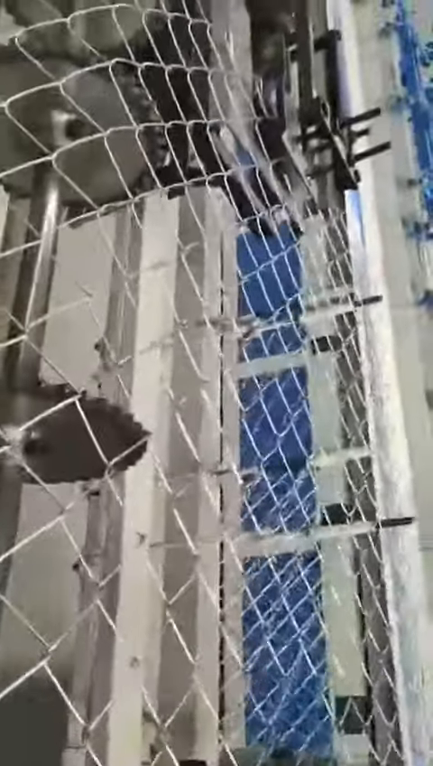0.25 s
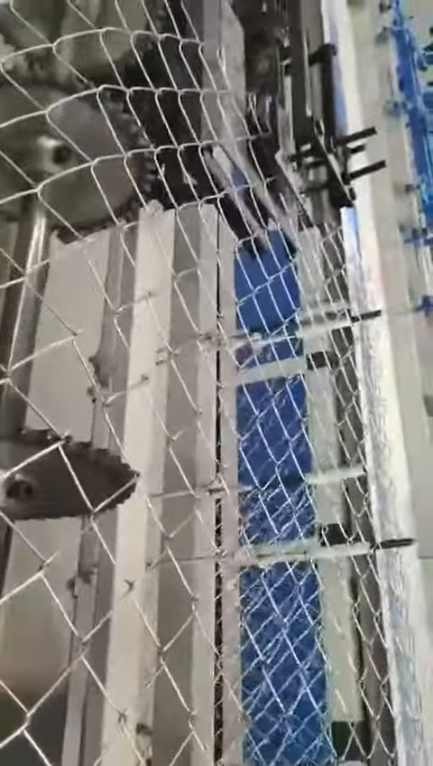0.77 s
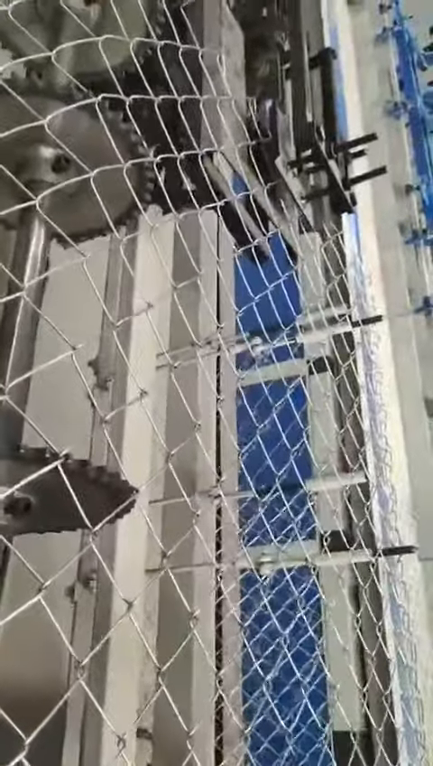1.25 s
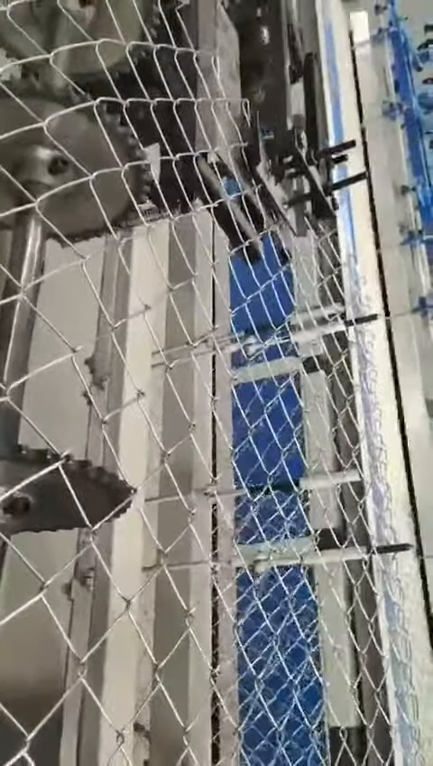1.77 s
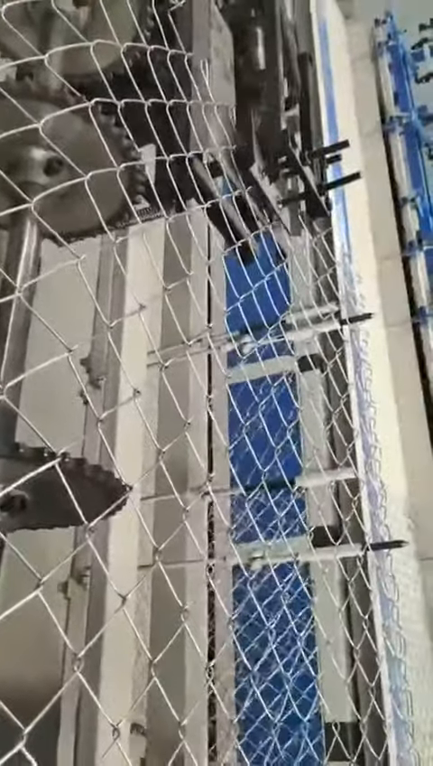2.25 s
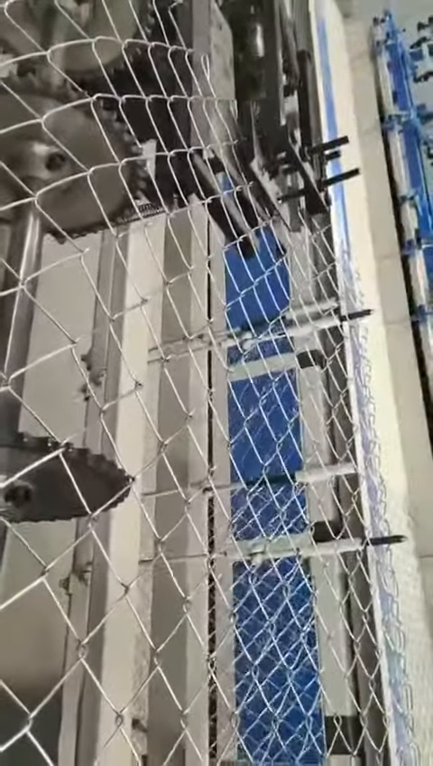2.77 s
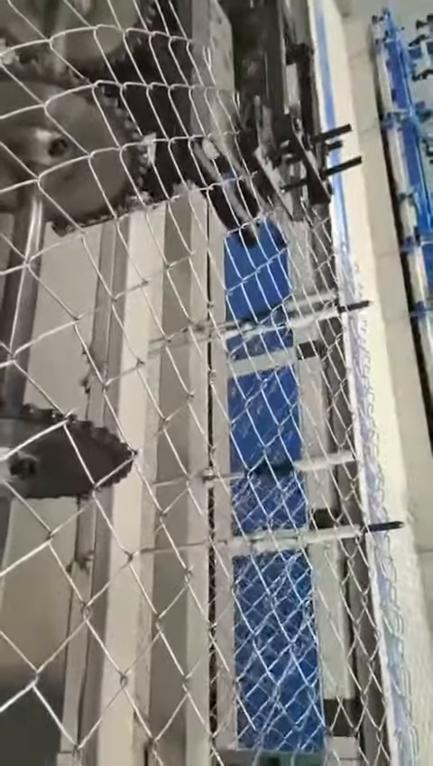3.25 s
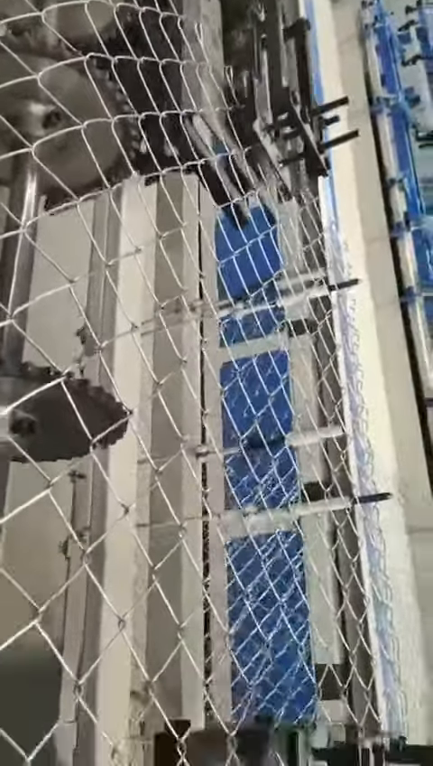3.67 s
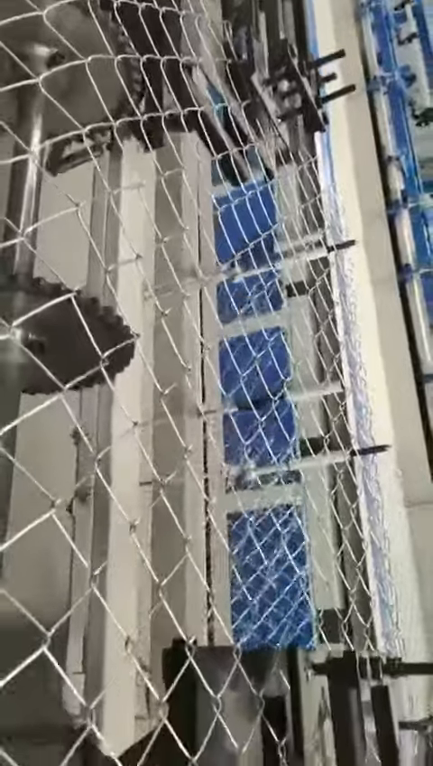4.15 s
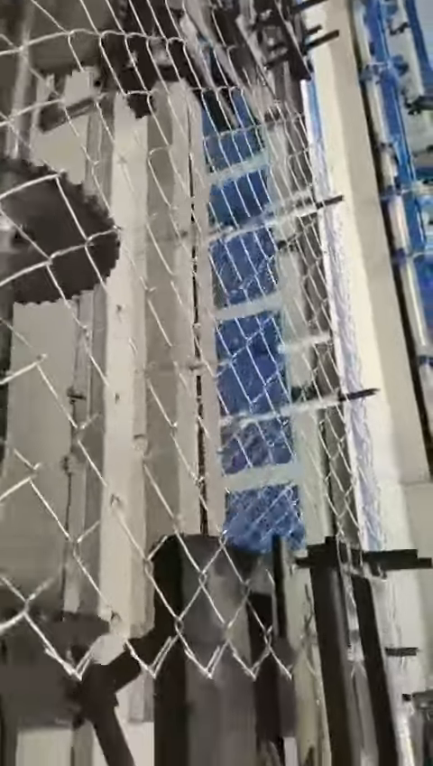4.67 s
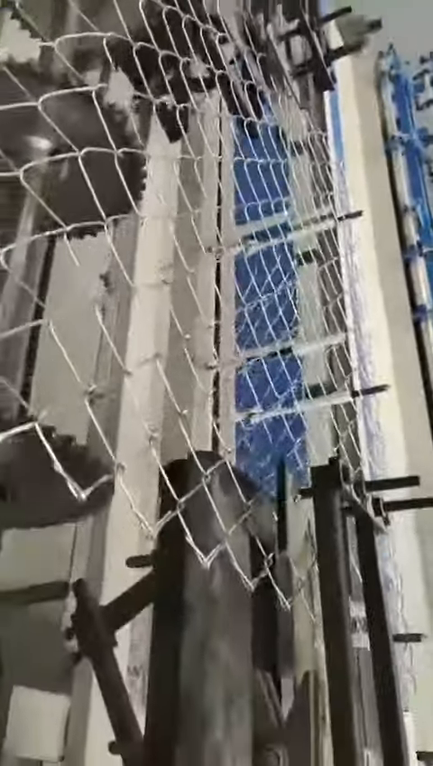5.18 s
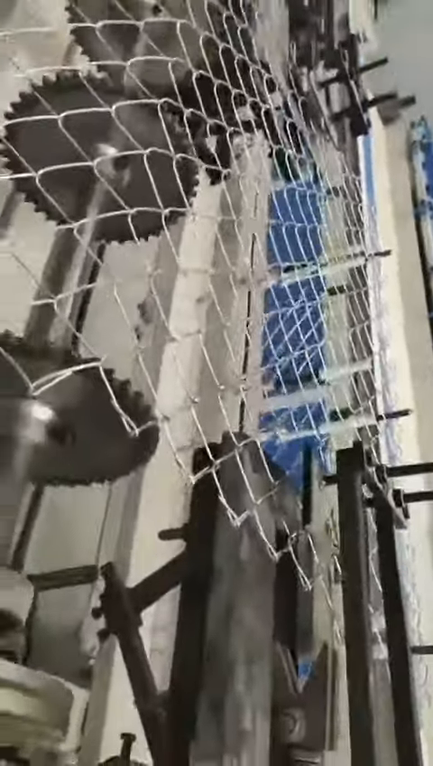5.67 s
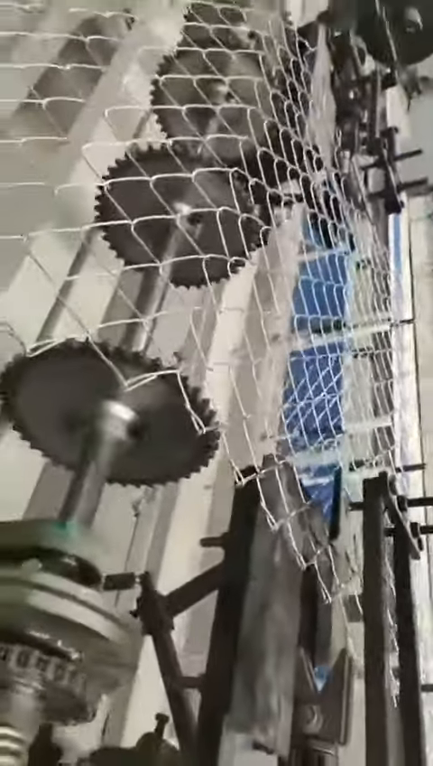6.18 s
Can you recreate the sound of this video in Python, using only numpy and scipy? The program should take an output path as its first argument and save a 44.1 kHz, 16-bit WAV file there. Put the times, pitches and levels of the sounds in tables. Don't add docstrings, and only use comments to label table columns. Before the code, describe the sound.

Close to a wire weaving machine in a factory hall, gears rumble and chains clatter without pause, over a wavering low-mid motor whine, shaking floor and airy far machinery. From 0 to 0.8 seconds, bright brushing slaps of a blade slow down. At 1.13 a mesh advance lands with a low thud and frame groan; hooks and cutter crack on steel until about 2.0, with a strong frame blow near 2.1. From 2.45 to 4.7 the blade whips the next wire about eleven times a second, each slap a short hissy chatter ringing its guide, strongest around 4.1 to 4.6. Lighter pawl taps run from 2.9 to 3.3, with a thud near 3.0. Winding stops; at 5.06 to 5.27 the second advance thuds repeatedly with rubbing slides. Knocks and clanks return near 5.8 to 6.0, a heavy blow falls at 6.13, and the roar continues to 6.4.

```python
import sys
import numpy as np
from scipy import signal
from scipy.fft import rfft, irfft
from scipy.io import wavfile
from scipy.ndimage import uniform_filter1d

SR = 44100
rng = np.random.default_rng(int(sys.argv[2]) if len(sys.argv) > 2 else 0)


def elevation(decibels):
    levels = np.asarray(decibels, float)
    return 10 ** (levels / 20)


def dump(signal):
    limited = np.clip(np.atleast_2d(signal).T, -1, 1)
    pcm = np.round(limited * 32767).astype(np.int16)
    wavfile.write(sys.argv[1], SR, pcm)


N = 283122

# start in seconds, peak in dB, centre in Hz, guide ringing in dB.
SLAPS = [(2.4594, -26, 5510, -41), (2.5304, -26, 5480, -45), (2.6509, -22, 4700, -39),
         (2.7482, -17.5, 5730, -34), (2.8394, -22, 5560, -45), (2.9444, -21.5, 5640, -35),
         (3.0453, -19, 5760, -31.5), (3.09, -18, 5500, -36), (3.2257, -20, 5300, -30.5),
         (3.315, -28, 5600, -55.5), (3.395, -18.5, 5500, -30.5), (3.4986, -18, 5600, -49),
         (3.595, -13.5, 5510, -36), (3.6894, -21, 5380, -42), (3.7853, -16, 5540, -32.5),
         (3.879, -19, 5600, -41), (3.9624, -19, 5460, -49), (4.1062, -21, 5520, -40),
         (4.1598, -16, 5470, -48), (4.267, -14, 4740, -48), (4.3151, -14, 5370, -43),
         (4.3852, -12, 5400, -35), (4.4882, -17, 4770, -43), (4.547, -24, 5500, -43),
         (4.583, -15, 5600, -37), (4.6994, -27, 5540, -47)]


def evened(x):
    return x / np.sqrt(np.mean(x ** 2) + 1e-20)


def drift(noise, size):
    return evened(uniform_filter1d(uniform_filter1d(noise, size=size), size=size))


def along(rows):
    table = np.vstack(rows)
    return np.interp(np.arange(N) / SR, table[:, 0], table[:, 1], left=-120, right=-120)


def add(mix, s, sound):
    part = mix[round(s * SR):][:len(sound)]
    part += sound[:len(part)]


def high_pass(x, hz):
    return signal.sosfilt(signal.butter(2, hz, "high", fs=SR, output="sos"), x)


def resonate(x, hz, width):
    r = np.exp(-np.pi * width / SR)
    return 2 * signal.lfilter([1 - r], [1, -r * np.exp(2j * np.pi * hz / SR)], x).real


def band(noise, hz, width):
    return evened(resonate(resonate(noise, hz, width), hz, width))


def clicks(per_s, spread_db):
    size = elevation(spread_db * np.minimum(rng.exponential(1, N), 4)) * rng.choice([-1, 1], N)
    return evened(size * (rng.random(N) < per_s / SR))


def roar(spectrum, level_db, patchy_db, grain=0, per_s=300, size=512):
    source = rng.standard_normal(N) + grain * clicks(per_s, 1.1)
    overlap = size * 3 // 4
    hz, t, z = signal.stft(source, SR, nperseg=size, noverlap=overlap)
    patches = uniform_filter1d(rng.standard_normal(z.shape), size=2, axis=0)
    patches = evened(uniform_filter1d(patches, size=14, axis=1))
    f, db = np.transpose(spectrum)
    colour_db = np.interp(np.log(hz + 1), np.log(f), db, left=-90, right=-90)
    z = z * elevation(colour_db[:, None] + patchy_db * patches)
    x = signal.istft(z, SR, nperseg=size, noverlap=overlap)[1][:N]
    return elevation(level_db) * evened(x)


def gear_load():
    # time in seconds, clatter in dB.
    load_steps = [(0.0, -29), (1.127, -32), (1.136, -24), (1.48, -28), (1.86, -23.5), (2.0, -27),
                  (2.25, -24), (2.57, -27.5), (3.09, -27.5), (3.7, -30), (4.35, -28.5), (5.06, -30),
                  (5.115, -32.5), (5.14, -26.5), (5.52, -29.5), (5.78, -26), (6.26, -23.5), (6.42, -26.5)]
    mean_db = -28
    return along(load_steps) - mean_db


def gear_roar(load):
    # frequency in Hz, level in dB per Hz.
    rumble = [(71, -53), (120, -20.5), (219, -0.5), (440, -4), (464, -10), (592, -6.5), (651, -13.5),
              (1010, -10), (1500, -22.5), (1950, -41), (3300, -120)]
    # frequency in Hz, level in dB per Hz.
    clatter = [(300, -19.5), (520, -10), (700, -6.5), (1050, -9), (1900, -8.5), (2500, -11), (3000, -16.5),
               (3600, -25.5), (4800, -32), (6500, -51.5)]
    low = roar(rumble, -36.5 + 0.38 * load, patchy_db=0.0, grain=0.14, per_s=120, size=1024)
    return low + roar(clatter, -28.5 + 0.95 * load, patchy_db=1.2, grain=0.21, per_s=730)


def wire_hiss():
    # time in seconds, hiss in dB.
    wire_run = [(0.0, -30.5), (1.125, -42), (1.136, -30), (1.42, -38.5), (1.72, -34), (1.8, -27.5),
                (2.2, -27), (2.5, -32), (2.8, -29.5), (3.9, -30), (4.58, -27), (4.95, -38.5), (5.2, -33),
                (5.55, -43.5), (5.78, -40), (5.8, -29.5), (6.2, -29), (6.42, -33)]
    # frequency in Hz, level in dB per Hz.
    hiss = [(1500, -17), (2500, -2), (3200, -4), (4200, -4.5), (5700, -3), (6600, -10), (7400, -10.5),
            (8600, -32.5)]
    mean_db = -33
    level_db = -34 + 1.184 * (along(wire_run) - mean_db)
    return roar(hiss, level_db, patchy_db=2.2, grain=0.51, per_s=830)


def slaps():
    # start in seconds, peak in dB, centre in Hz, length in seconds.
    last_slaps = [
        (0.038, -17.5, 4640, 0.02),
        (0.145, -20, 5340, 0.023),
        (0.206, -23, 5800, .035),
        (0.325, -21, 6050, .025),
        (0.3594, -26.5, 6500, 0.051),
        (0.514, -23.5, 5960, 0.034),
        (0.5994, -23, 5560, 0.05),
        (0.748, -26, 4780, 0.039),
    ]
    slap_s = 0.032
    slap_hiss, last_hiss = (4900, 2300, 0.72), (5600, 5000, 1.16)  # (Hz, width Hz, share)
    rows = [(*row, last_hiss) for row in last_slaps]
    rows += [(s, db, hz, slap_s, slap_hiss) for s, db, hz, _ in SLAPS]
    out, t = np.zeros(N), np.arange(4000) / SR
    for s, db, hz, length, (hiss_hz, width, share) in rows:
        noise = rng.standard_normal((2, len(t)))
        chatter = share * band(noise[0], hiss_hz, width) + 0.49 * band(noise[1], hz, 130)
        swell = np.minimum(t / 0.0041, 1) * np.exp(-(t / length) ** 2)
        add(out, s, elevation(db - 12.5) * chatter * swell)
    return out


def spinning_wire():
    # time in seconds, ringing in dB.
    spin = [
        (2.44, -41),
        (2.65, -49),
        (2.9, -38),
        (3.3, -36),
        (3.85, -39.5),
        (4.1, -31),
        (4.4, -34.5),
        (4.58, -33),
        (4.78, -45),
    ]
    # frequency in Hz, width in Hz, level in dB.
    guide = [(3950, 250, -9), (4735, 150, -9), (5510, 75, 0), (5580, 90, -2), (7400, 200, -14)]
    press_s, press_lag_s = 0.017, 0.016
    clumps = drift(rng.standard_normal(N), 400)
    drive = (clicks(600, 1.7) + 0.5 * rng.standard_normal(N)) * elevation(0.4 * clumps)
    ring = sum(elevation(db) * band(drive, hz, width) for hz, width, db in guide)
    ring = 1.3 * evened(ring / uniform_filter1d(ring ** 2, size=900) ** 0.3)
    t = np.arange(N) / SR
    pressed = sum(elevation(db) * np.exp(-((t - s - press_lag_s) / press_s) ** 2) for s, _, _, db in SLAPS)
    return (elevation(along(spin) - 2.5) + pressed) * ring


def knocks():
    # start in seconds, peak in dB, ring in Hz, t60 in seconds, second ring in Hz.
    hook_knocks = [(1.131, -19, 2290, 0.18, 5300), (1.294, -12.5, 2030, 0.095, 2930),
                   (1.521, -20, 2280, 0.12, 4200), (1.616, -18.5, 2550, 0.31, 6070),
                   (1.769, -13.5, 3300, .09, 7500), (1.811, -9.5, 5150, 0.093, 6700),
                   (1.74, -26, 5020, .12, 7360), (2.0, -9.5, 4700, 0.12, 5470),
                   (5.131, -17.5, 2050, 0.15, 5320), (5.259, -22.5, 2140, 0.15, 4200),
                   (5.541, -24, 2240, 0.072, 3710), (5.797, -17, 3270, 0.14, 4796),
                   (5.985, -17, 2330, 0.12, 2960)]
    # start in seconds, peak in dB, ring in Hz.
    taps = [
        (0.329, -22, 3260),
        (0.55, -16, 2710),
        (2.581, -25, 2600),
        (2.883, -13.5, 2550),
        (2.965, -13.5, 2150),
        (3.041, -13.5, 2400),
        (3.145, -18.5, 2440),
        (3.225, -18, 2550),
        (3.261, -12, 2750),
        (3.33, -15.5, 2640),
    ]
    # start in seconds, peak in dB, ring in Hz, second ring in Hz.
    clanks = [
        (1.908, -17.5, 3900, 5730),
        (5.978, -16.5, 4000, 5000),
        (5.69, -35, 4500, 4500),
        (5.0, -33, 4300, 4500),
    ]
    blows = [(*row, 0.73) for row in hook_knocks]
    blows += [(s, db, hz, 0.077, hz * 1.15, 0.27) for s, db, hz in taps]
    blows += [(s, db, hz, 0.16, other_hz, 2.46) for s, db, hz, other_hz in clanks]
    chatter_s, chatter_hz = 0.03, 4460
    out, t = np.zeros(N), np.arange(8000) / SR
    for s, db, hz, t60, other_hz, crack in blows:
        noise, phase = rng.standard_normal((3, len(t))), rng.random()
        rings = 0.55 * np.sin(2 * np.pi * (hz * t + phase)) + 0.3 * np.sin(2 * np.pi * other_hz * t)
        rings += 1.2 * band(noise[1], hz, 460) + 0.16 * band(noise[2], other_hz, 300)
        fall = elevation(-60 * t / t60)
        rattle = crack * band(noise[0], (hz + other_hz) / 2, chatter_hz)
        rattle *= 0.47 * fall + 0.45 * np.exp(-(t / chatter_s) ** 4)
        strike = np.minimum(t / 0.001, 1) * (1 + 0.5 * np.exp(-t / 0.004))
        add(out, s, elevation(db - 12.5) * (rattle + rings * fall) * strike)
    return high_pass(out, 700)


def thuds():
    # start in seconds, peak in dB, ring in Hz, t60 in seconds.
    frame_blows = [(1.134, -3.5, 328, 0.12), (1.189, -12, 422, 0.36), (1.351, -19, 262, 0.17),
                   (1.518, -12.5, 564, 0.22), (1.679, -10, 880, 0.11), (1.859, -3, 790, 0.084),
                   (1.944, -23.5, 734, 0.09), (2.101, 3.5, 620, 0.095), (2.869, -16, 533, 0.2),
                   (3.023, -5.5, 502, 0.13), (4.748, -13, 376, 0.41), (5.059, -3, 600, 0.099),
                   (5.132, -1, 286, 0.18), (5.194, -9.5, 261, 0.16), (5.269, -5, 570, 0.19),
                   (5.759, -4, 895, 0.085), (6.134, 1, 380, 0.073)]
    out, t = np.zeros(N), np.arange(12000) / SR
    for s, db, hz, t60 in frame_blows:
        noise = rng.standard_normal((2, len(t)))
        body = band(noise[0], hz, 100) + 0.32 * band(noise[1], 440, 300)
        add(out, s, elevation(db - 17) * body * elevation(-60 * t / t60) * np.minimum(t / 0.007, 1))
    return high_pass(out, 170)


def drags():
    advances = [
        1.13,
        5.13,
    ]
    # time after its start in seconds, length in seconds, Hz, width in Hz, level in dB.
    advance_parts = [(-.3, 0.53, 535, 37.04, -38.5), (0, .35, 253, 33.3, -37.5), (0, 0.04, 394, 238, -30.5),
                     (.03, 0.31, 553.5, 65, -36.5), (0, .36, 2100, 690, -35), (0.54, .3, 269, 48.6, -36),
                     (.5, .42, 829, 250, -35), (.65, .72, 2870, 940, -34), (0, .8, 327, 237.6, -37.5),
                     (0, .3, 148, 80, -42), (1.011, .3, 113, 70, -47.5)]
    # start in seconds, length in seconds, Hz, width in Hz, level in dB.
    single_drags = [(0.099, 1, 895, 78, -53.5), (1.15, 0.18, 860, 82, -44), (1.1, 0.36, 1610, 180, -43),
                    (1.7, 0.29, 1150, 110, -39.5), (1.87, 0.073, 203, 40, -37), (2.2, 0.36, 730, 53, -39),
                    (2.651, 0.82, 1140, 74, -41), (2.85, 0.5, 580, 100, -41.5),
                    (2.77, 0.54, 2430, 800, -35.5), (5.7, .3, 424, 200, -33.5),
                    (0.77, 0.25, 370, 150, -40.5), (2.9, 0.48, 360, 200, -39.5),
                    (3.699, 0.85, 960, 84, -43), (4.1, 0.73, 1730, 150, -41),
                    (5.135, .035, 295, 250, -25.5), (1.45, 0.16, 275, 76, -42),
                    (5.136, 0.14, 1330, 202, -33), (5.998, .3, 377, 41, -35.5),
                    (5.903, 0.39, 1540, 230, -49)]
    rise, fall = 0.15, 0.29
    cycles = [(start + s, *rest) for start in advances for s, *rest in advance_parts]
    out = np.zeros(N)
    for s, length, hz, width, db in cycles + list(single_drags):
        noise = rng.standard_normal(int(length * SR))
        u = np.linspace(0, 1, len(noise))
        grip = np.clip(np.minimum(u / rise, (1 - u) / fall), 0, 1)
        add(out, s, elevation(db + 0.7) * band(noise, hz, width) * np.sin(np.pi / 2 * grip))
    return high_pass(out, 70)


def whine(load):
    motor_hz = 469.5
    noise = rng.standard_normal((4, N))
    t = np.arange(N) / SR
    winding = uniform_filter1d(1.0 * (t > 4.1) * (t < 4.9), size=8000)
    level_db = -43.5 - 0.2 * load + 1.7 * drift(noise[3], 3000) + 1.5 * winding
    line_hz = motor_hz + 3.5 * drift(noise[0], 4000)
    line = np.sqrt(2) * np.sin(2 * np.pi * np.cumsum(line_hz) / SR)
    return elevation(level_db) * (0.89 * line + band(noise[1], motor_hz, 52) + 0.75 * band(noise[2], 930.2, 55))


def hall(x):
    t, t60 = np.arange(SR // 2) / SR, 0.6
    echoes = rng.choice([-1, 1], len(t)) * (rng.random(len(t)) < 0.05)
    tail = echoes * elevation(-60 * t / t60) * (t > 0.012)
    return signal.fftconvolve(x, tail / np.linalg.norm(tail))[:N]


def shaking_floor(load):
    # frequency in Hz, level in dB per Hz.
    floor_colour = [(20, -39.5), (40, -20.5), (63, -18), (100, -7), (140, -6), (200, -2), (300, -41)]
    return roar(floor_colour, -45.5 + 0.62 * load, patchy_db=1.5, size=4096)


def far_machines():
    # frequency in Hz, level in dB per Hz.
    air_colour = [(3000, -9), (4200, 5), (5500, -1.5), (6700, -1.5), (7400, 1.5), (8600, -24)]
    return roar(air_colour, -48.5, patchy_db=3.5)


def scene():
    load = gear_load()
    hits = slaps() + knocks() + thuds()
    machine = gear_roar(load) + wire_hiss() + spinning_wire() + drags() + whine(load)
    mono = machine + hits + elevation(-9) * hall(hits) + shaking_floor(load) + far_machines()
    return np.array([mono, mono])


def narrowed(x):
    window = np.sin(np.pi * (np.arange(1024) + 0.5) / 1024)
    hz, t, z = signal.stft(x, SR, nperseg=len(window), window=window)
    edge_hz = np.repeat(7900 + 85 * rng.standard_normal(len(t)), repeats=4)[:len(t)]
    edge_hz = edge_hz - 300 * (rng.random(len(t)) < 0.09)
    return signal.istft(z * (hz[:, None] < edge_hz), SR, nperseg=len(window), window=window)[1][:, :N]


def side_flickers():
    # start in seconds, low edge in Hz, high edge in Hz, side level in dB.
    noise_bands = [(.37, 4150, 5160, -49), (1.16, 6200, 7500, -48), (1.37, 5160, 6300, -48),
                   (1.58, 4150, 5200, -49), (2.16, 4130, 5190, -40), (2.16, 6200, 7600, -44),
                   (2.789, 4100, 5770, -38), (3.459, 4550, 6240, -38), (3.97, 4640, 5950, -33),
                   (4.18, 4230, 5170, -38), (5.5, 5600, 6900, -55)]
    side, hz = np.zeros(N), np.fft.rfftfreq(2048, 1 / SR)
    for s, low_hz, high_hz, db in noise_bands:
        noise = irfft(rfft(rng.standard_normal(2048)) * (hz > low_hz) * (hz < high_hz))
        add(side, s, elevation(db) * evened(noise) * np.sin(np.pi * np.arange(2048) / 2048))
    return np.array([side, -side])


def top_cut(x):
    return signal.sosfilt(signal.butter(12, 8970, fs=SR, output="sos"), x)


def record(dry):
    mix = narrowed(dry) + side_flickers()
    return top_cut(mix)


dry = scene()
out = record(dry)
dump(out)
```